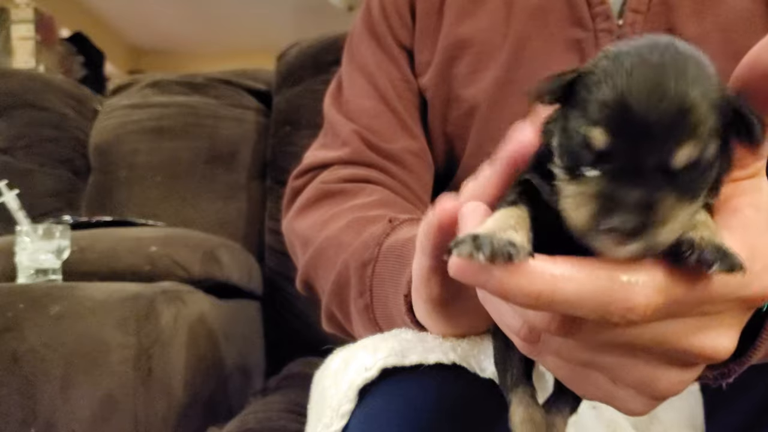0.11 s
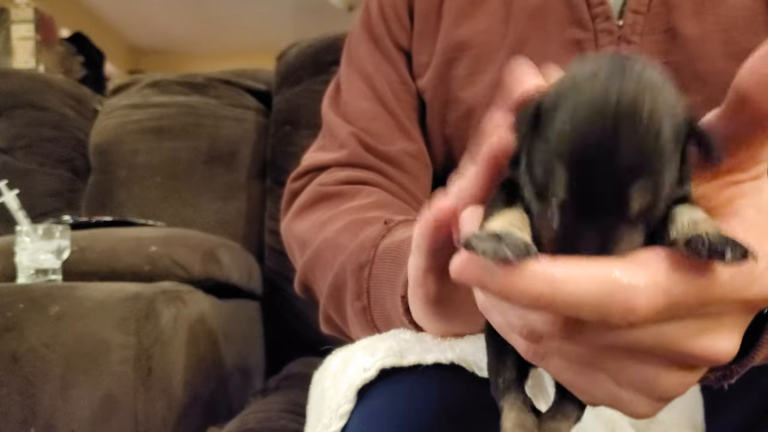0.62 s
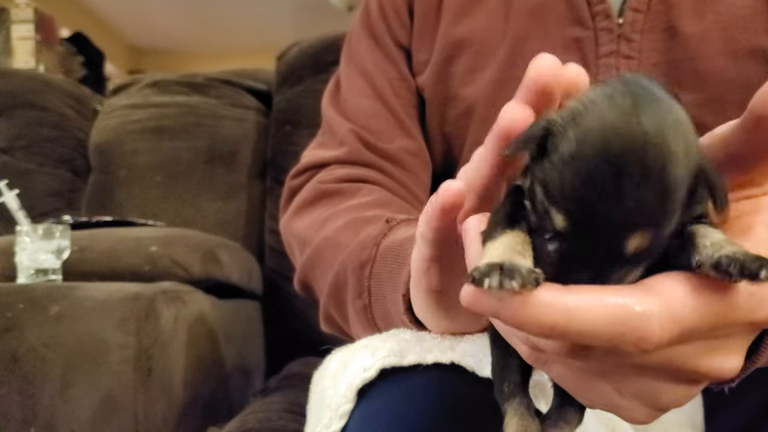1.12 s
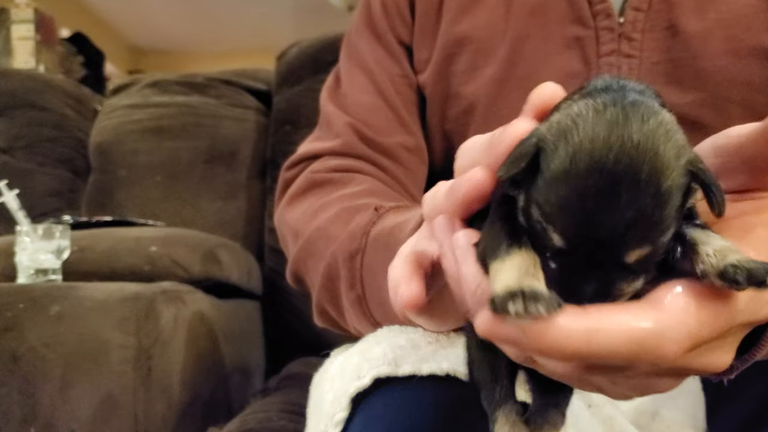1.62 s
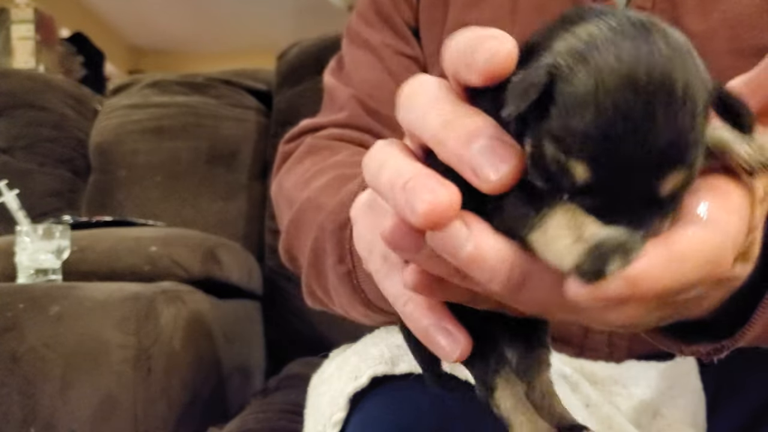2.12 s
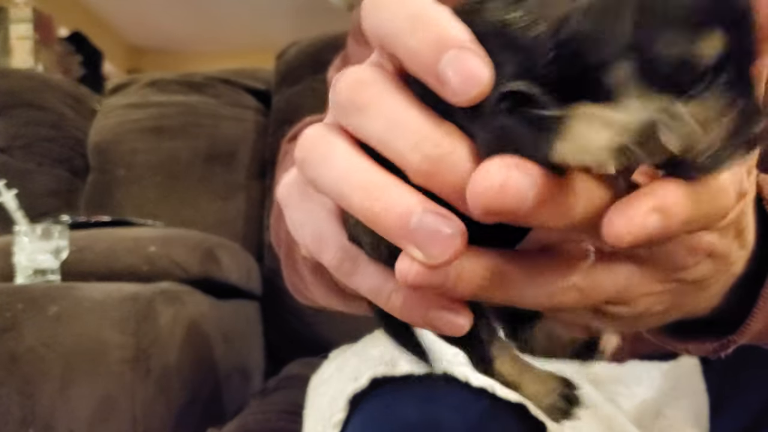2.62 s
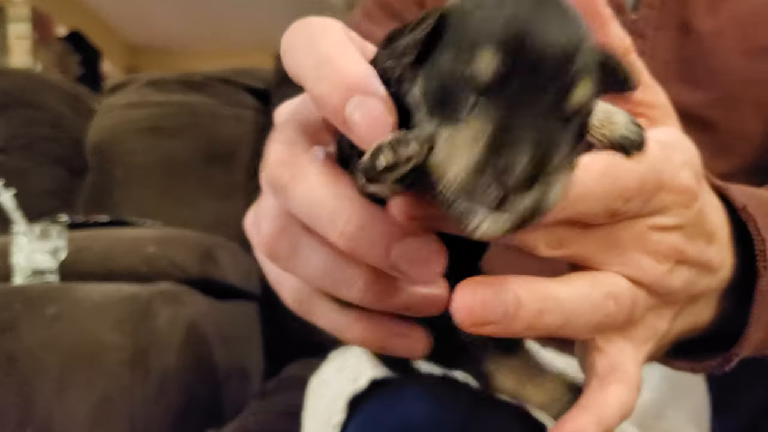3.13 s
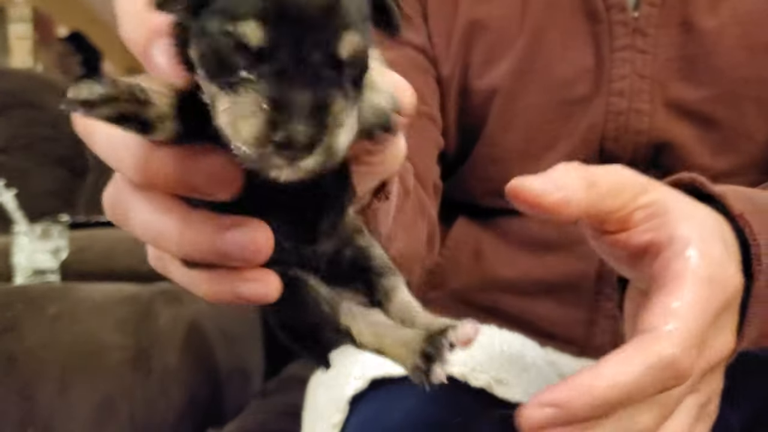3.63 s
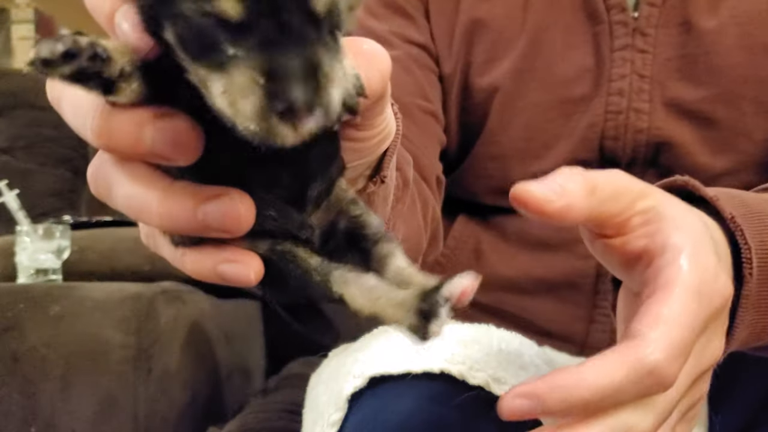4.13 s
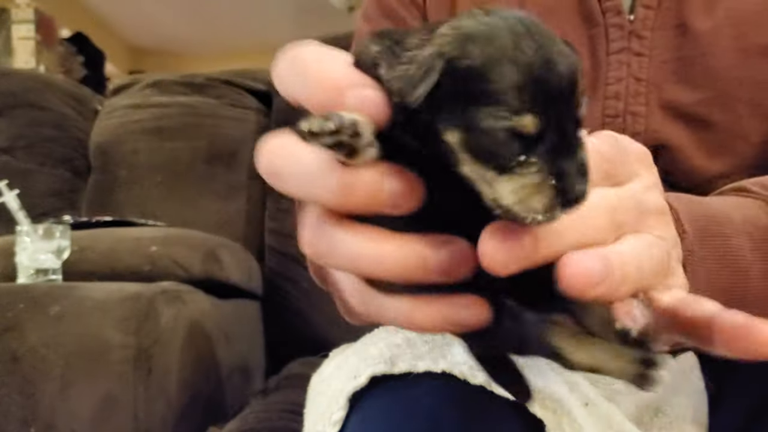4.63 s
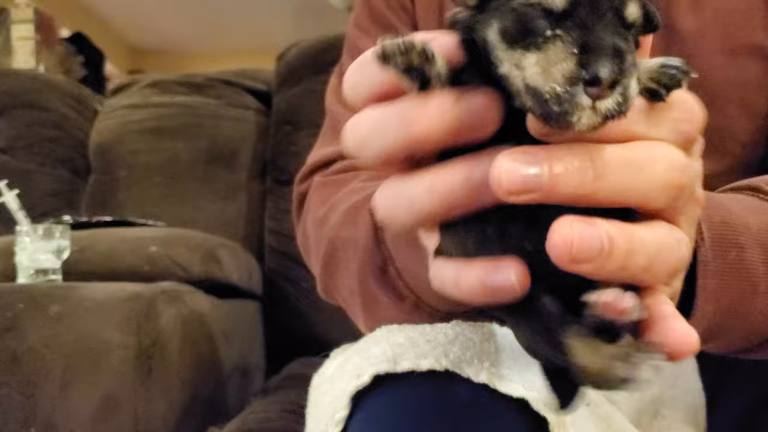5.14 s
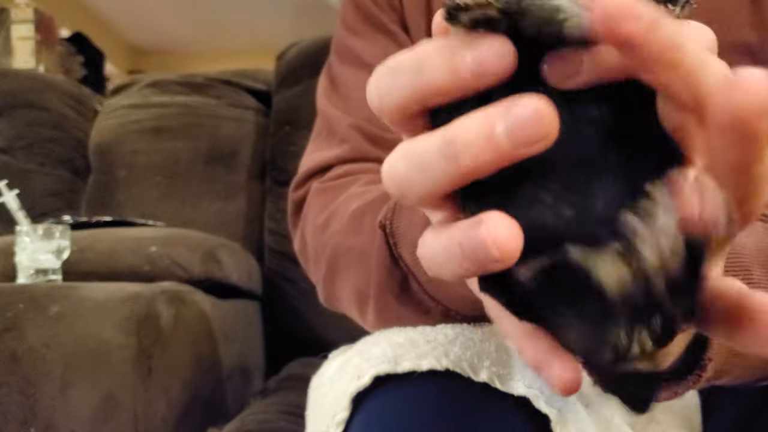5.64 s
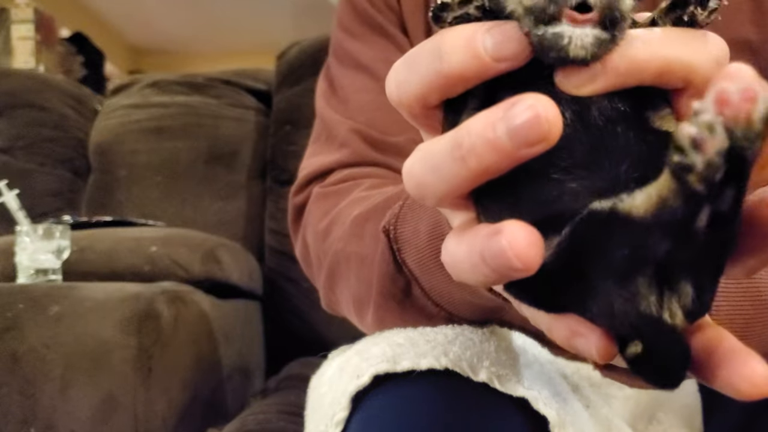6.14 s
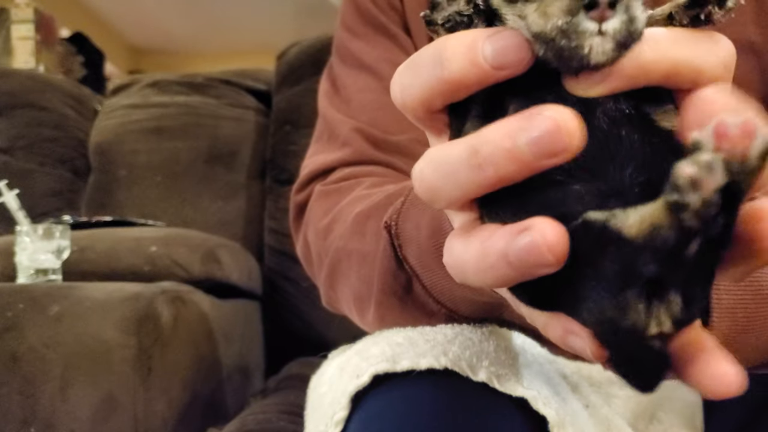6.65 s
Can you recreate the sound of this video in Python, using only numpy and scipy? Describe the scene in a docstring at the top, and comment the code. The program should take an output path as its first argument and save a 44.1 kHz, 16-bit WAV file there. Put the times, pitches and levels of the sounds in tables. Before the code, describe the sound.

Tiny puppy whimpers close up: small soft peeps and mouth clicks first, then regular short yelping cries, the last one longer and rasping.

```python
"""Newborn puppy crying

A puppy held close to a stereo microphone in a soft furnished room whimpers, then cries in a steady bout.
Each cry is a stack of gliding partials, most with a rasp of random slaps and a puff of filtered noise.
Its wet mouth clicks with short rings and fur rustles in dull grains; an appliance hums on two low tones
that swell and drop out, over shaped-noise rumble and faint microphone hiss."""
import sys
import numpy as np
from scipy import signal
from scipy.fft import rfft, irfft, next_fast_len
from scipy.io import wavfile
from scipy.ndimage import uniform_filter1d

SR = 44100
rng = np.random.default_rng(int(sys.argv[2]) if len(sys.argv) > 2 else 0)


def natural_amplitude(level_db):
    """Convert a level in decibels to a linear amplitude factor, elementwise."""
    exponent = np.asarray(level_db, float) / 20
    return 10 ** exponent


def output_pcm(signal):
    """Save a mono or channel-first signal as 16-bit PCM at the path in sys.argv[1].

    Samples are clipped to [-1, 1] before scaling.
    """
    pcm = np.clip(np.atleast_2d(signal).T, -1, 1) * 32767
    wavfile.write(sys.argv[1], SR, np.round(pcm).astype(np.int16))


N = 298998

# voiced cries, one curve each: (time [s], pitch [Hz], level [dB])
CRY_CURVES = [
    [(.253, 430, -68), (.259, 475.8, -58), (.268, 509.3, -47.5), (.275, 462.3, -40), (.283, 437.9, -62),
     (.293, 420.8, -58)],
    [(.496, 456, -67), (.508, 496, -42.5), (.518, 531, -61), (.526, 495, -53)],
    [(.74, 588, -61), (.746, 639.2, -56), (.754, 698, -43), (.764, 718, -38), (.786, 643, -38.5),
     (.794, 610, -36), (.802, 618, -54)],
    [(1.512, 801, -63), (1.518, 830, -52.5), (1.546, 1035, -42.5), (1.554, 1041, -32), (1.564, 889, -48),
     (1.572, 817, -41), (1.58, 820, -67)],
    [(1.702, 711, -85), (1.708, 713, -47), (1.716, 734, -57.5), (1.722, 756, -57)],
    [(1.826, 798, -64.5), (1.832, 796, -54), (1.84, 733, -40.5), (1.85, 728, -74)],
    [(2.011, 860, -54), (2.016, 758.2, -57), (2.026, 700, -52.5), (2.036, 759.5, -53.5),
     (2.045, 858.8, -64)],
    [(2.305, 799, -93), (2.313, 774, -49.5), (2.323, 676, -49), (2.343, 600, -55.5), (2.352, 608, -58),
     (2.362, 619, -70)],
    [(3.127, 290, -63.5), (3.136, 390, -35.5), (3.146, 464.5, -33), (3.156, 518, -29.5),
     (3.172, 586.6, -29), (3.19, 685, -30), (3.2, 690, -25.5), (3.216, 636, -29), (3.236, 563, -43.5)],
    [(3.398, 981, -69), (3.404, 980, -46.5), (3.414, 980, -46.5), (3.432, 997, -37.5), (3.47, 842, -29),
     (3.484, 702, -28.5), (3.498, 644, -44)],
    [(3.672, 978, -71.5), (3.677, 968, -51.5), (3.686, 911, -47.5), (3.722, 885, -36), (3.744, 745, -35),
     (3.758, 730, -34), (3.762, 730, -82)],
    [(3.94, 1139, -62), (3.95, 1039, -54), (3.96, 972, -39.5), (4.008, 1097, -36), (4.026, 1061, -28.5),
     (4.036, 933, -41), (4.044, 839, -26), (4.052, 865, -75.5)],
    [(4.258, 935, -64.5), (4.263, 895, -56), (4.272, 856, -50.5), (4.292, 896, -41), (4.322, 785, -31.5),
     (4.334, 728, -30.5), (4.346, 715, -61)],
    [(4.525, 894, -59), (4.539, 785, -49.5), (4.565, 849, -36.5), (4.605, 835, -29.5), (4.619, 723, -30),
     (4.639, 636, -45)],
    [(4.82, 681, -51.5), (4.842, 786, -39.5), (4.866, 825, -31.5), (4.9, 873, -24.5), (4.922, 867, -28),
     (4.936, 748, -26), (4.948, 718, -45)],
    [(5.128, 650, -54), (5.142, 732, -55.5), (5.174, 883, -33.5), (5.216, 876, -31.5), (5.232, 781, -30),
     (5.244, 733, -30), (5.256, 731, -60)],
    [(5.452, 855, -65), (5.462, 898, -49.5), (5.486, 933, -37), (5.516, 879, -29), (5.558, 822, -31),
     (5.574, 754, -32.5), (5.592, 776, -42.5)],
    [(5.771, 1480, -52.5), (5.777, 1400, -56.5), (5.793, 1005, -40), (5.815, 1005, -33.5),
     (5.857, 932, -37), (5.883, 861, -32), (5.893, 764, -38.5), (5.907, 672, -38.5), (5.911, 670, -42)],
    [(6.112, 880, -61), (6.13, 963, -46.5), (6.16, 954, -37), (6.186, 882, -38), (6.202, 869, -50.5),
     (6.224, 906, -44.5), (6.234, 907, -51)],
    [(6.488, 1316, -49), (6.498, 1253, -47), (6.508, 1032, -38), (6.542, 935, -29.5), (6.564, 888, -30.5),
     (6.582, 829, -36.5), (6.615, 827.4, -31.5), (6.65, 822, -30.5), (6.656, 825, -40)],
    [(6.68, 1350, -43), (6.69, 1500, -37), (6.705, 1400, -42), (6.72, 950, -43), (6.732, 780, -72)],
]
# puffs of air, with or without a cry; a long cry may have several:
# (start [s], break [s], tail [s], leak under the voice [dB], throat rasp [dB],
# mouth rush [dB], nostril hiss [dB], pinch: top nostril resonance against the lower ones [dB])
BREATH_ROWS = [ (0.29, 0.254, 0.062, -83, -39.5, -69, -57, 14),
               (0.493, 0.5, 0.078, -85, -54.5, -71, -62, 8), (0.726, 0.773, 0.054, -78, -52.5, -55, -50, 8),
               (1.28, 1.289, 0.054, -74, -58, -64.5, -49.5, 9),
               (1.502, 1.565, 0.07, -61.5, -52, -57.5, -46.5, 7.5),
               (1.826, 1.832, 0.056, -62, -49, -56.5, -46, 6), (1.89, 1.943, 0.096, -72, -75, -78, -68, 10),
               (2.104, 2.107, 0.042, -72, -72, -77, -59.5, -8),
               (2.663, 2.682, 0.051, -51.5, -46.5, -57.5, -41.5, 0),
               (2.863, 2.915, 0.087, -71, -71, -69.5, -63.5, -4),
               (3.111, 3.138, 0.055, -58, -45.5, -43.5, -49, 9),
               (3.16, 3.215, 0.044, -55.5, -42, -34.5, -31.5, 18),
               (3.397, 3.471, 0.07, -66, -42, -52, -41.5, 5),
               (3.681, 3.743, 0.048, -59, -35, -53.5, -40.5, 17),
               (3.94, 4.04, 0.068, -57.5, -42.5, -50, -45, 21),
               (4.257, 4.331, 0.051, -58, -44, -50, -43, 9.5),
               (4.521, 4.617, 0.069, -64.5, -40, -46, -45, 3.5),
               (4.815, 4.938, 0.073, -51.5, -41.5, -55.5, -45.5, 3.5),
               (5.115, 5.235, .06, -61, -40, -53, -43, 4),
               (5.445, 5.56, 0.071, -54.5, -36, -55.5, -39, 7.5),
               (5.776, 5.892, 0.063, -52, -35, -44.5, -37.5, 3.5),
               (6.107, 6.212, .06, -54.5, -49, -43.5, -54, 2.5),
               (6.199, 6.244, 0.052, -57, -37, -44, -39.5, 8),
               (6.485, 6.599, 0.076, -43, -45, -45.5, -36.5, 7),
               (6.601, 6.665, 0.066, -41, -27.5, -42, -39, 5),
               (6.681, 6.699, 0.12, -29.5, -52, -63, -60, 2.5), ]
# mouth of each cry: (resonance [Hz], roughness [1], octave against fundamental [dB],
# upper partials against fundamental [dB], upper partials' gain per dB of effort [dB/dB])
MOUTH_ROWS = [(1340, .3, -1, -1.5, -0.4), (1500, .3, 2, -6, .3), (3470, 0.25, 1, -2.5, .3),
              (3190, 0.14, -4.5, -10.5, .1), (1900, 0.31, -7, -32, .2), (3600, .5, -5, -12, .2),
              (1900, .4, -22, -43, .2), (2040, 0.33, -22.5, -36, .2), (3434, .4, -3.5, 5.5, -0.58),
              (2500, .1, -1.5, -6.5, 1), (2750, 0.21, -5.5, -14, 0.61), (2800, 0.056, -1.5, -15.5, -0.22),
              (2950, 0.19, -4.5, -18, .3), (2780, 0.071, -0.5, -9, 0.28), (3220, 0.13, 4.5, -10, -0.13),
              (3283, 0.06, -3, -16.5, -0.52), (3080, 0.27, -3, -5, -0.39), (3120, .15, 0, 2.5, 0.84),
              (3380, .15, 0.5, 6.5, 0.94), (3600, 0.43, 0.5, 9.5, .6), (3530, 0.837, -2, -29, .2)]


def rms_one(x):
    """Scale to unit power."""
    return x / np.sqrt(np.mean(x ** 2) + 1e-20)


def in_time(rows):
    """Columns of a curve, one value per sample."""
    s, *columns = np.transpose(rows)
    return [np.interp(np.arange(N) / SR, s, c) for c in columns]


def in_bouts(tables, edge_s):
    """Columns of a list of curves, with a gate that is shut between them."""
    gate = np.zeros(N)
    for rows in tables:
        gate[int(rows[0][0] * SR):int(rows[-1][0] * SR)] = 1
    all_rows = sum(map(list, tables), [])
    return uniform_filter1d(gate, int(edge_s * SR)), in_time(all_rows)


def per_bout(starts_s, values):
    """One value a bout, held until 10 ms before the next bout."""
    bout = np.searchsorted(np.array(starts_s) - .01, np.arange(N) / SR) - 1
    return np.array(values)[np.maximum(bout, 0)]


def at_hz(points, hz):
    """Read a spectrum on a log-frequency axis."""
    points = np.array(points)
    return np.interp(np.log(hz), np.log(points[:, 0]), points[:, 1])


def drift(corner_hz):
    """Slow chance of spread 1: noise through two equal poles."""
    r = np.exp(-2 * np.pi * corner_hz / SR)
    noise = rng.standard_normal(N + SR)
    return rms_one(signal.lfilter([1], [1, -2 * r, r * r], noise)[SR:])


def resonate(x, modes):
    """Parallel resonances with alternating signs, each passed twice for dark valleys."""
    out = 0
    for k, (hz, width_hz, level_db) in enumerate(modes):
        r = np.exp(-np.pi * width_hz / SR)
        b = (1 - r * r) / 2 * np.array([1, 0, -1])
        a = [1, -2 * r * np.cos(2 * np.pi * hz / SR), r * r]
        twice = signal.lfilter(b, a, signal.lfilter(b, a, x))
        out = out + (-1) ** k * natural_amplitude(level_db) * twice
    return out


def floor():
    """Steady shaped noise: rumble mostly alike on both sides, microphone hiss almost unrelated."""
    # (frequency [Hz], relative density [dB])
    spectrum = [(22, -28), (40, -8), (60, -11.5), (100, -10.5), (135, -20.5), (190, -28.5), (260, -22.5),
                (420, -32), (900, -40.5), (2200, -40), (4800, -43.5), (6300, -32), (7500, -46.5),
                (9700, -30), (14500, -40)]
    # (frequency [Hz], left-right correlation [1])
    likeness = [(60, 0.53), (130, 0.95), (640, 0.39), (1400, 0.0077)]
    level_db = -66
    hz = np.maximum(np.arange(N // 2 + 1) * SR / N, 1)
    alike = np.clip(at_hz(likeness, hz), 0, 1)
    mid, side = rfft(rng.standard_normal((2, N))) * natural_amplitude(at_hz(spectrum, hz))
    mid = np.sqrt(1 + alike) * mid
    side = np.sqrt(1 - alike) * side
    return natural_amplitude(level_db) * rms_one(irfft([mid + side, mid - side], N))


def hum():
    """Two low motor tones, pitch wavering slightly, level swelling and dropping out."""
    # (time [s], lower tone level [dB], upper tone level [dB])
    levels = [(0.0, -66, -70), (3.1, -71.5, -67), (3.19, -56.5, -60), (3.42, -67.5, -70),
              (4.08, -68.5, -59), (4.13, -91, -93), (4.22, -92, -83), (4.28, -64, -64.5), (6.72, -69, -67),
              (6.78, -74, -65)]
    # (lower tone [Hz], upper tone [Hz])
    tones_hz = (59, 91)
    out = 0
    for hz, level_db in zip(tones_hz, in_time(levels)):
        level = np.sqrt(2) * natural_amplitude(level_db + 3.4 * drift(12))
        out = out + level * np.sin(2 * np.pi * np.cumsum(hz + 0.63 * drift(2.8)) / SR)
    return out * natural_amplitude(np.array([[-1.2], [1.2]]))     # right side louder


def room(x):
    """Eight feedback delays a side, duller on every round."""
    t60_s, wall_cut_hz = 0.3, 3000
    size = next_fast_len(N + SR)
    hz = np.arange(size // 2 + 1) * SR / size
    source, out = rfft(x, size), np.zeros((2, size // 2 + 1), complex)
    for k, lag_s in enumerate(rng.uniform(0.012, 0.032, 16)):
        loop = natural_amplitude(-60 * lag_s / t60_s) / (1 + 1j * hz / wall_cut_hz) * np.exp(-2j * np.pi * hz * lag_s)
        out[k % 2] += (-1) ** (k // 2) * loop / (1 - loop)
    return irfft(out * source, size)[:, :N]


def rustle(grains_per_s):
    """Hands shift on fur: dull grains in lumps."""
    # one curve a shift: (time [s], level [dB])
    shifts = [
        [(.075, -66), (.098, -49), (.12, -62)],
        [(1.87, -69), (1.93, -66.5), (2.0, -70)],
        [(2.09, -60), (2.13, -62), (2.2, -61.5), (2.26, -75)],
        [(6.35, -86), (6.39, -66), (6.42, -67)],
        [(6.66, -58), (6.7, -43.5), (6.76, -82)],
    ]
    # (resonance [Hz], width per pass [Hz], relative level [dB])
    fur_modes = [(308, 370, 61), (734, 380, -41)]
    gate, (level_db,) = in_bouts(shifts, edge_s=0.05)
    strength_db = 0.9 * rng.standard_normal(N) + 3.05 * drift(14.2)
    grains = (rng.random(N) < grains_per_s / SR) * natural_amplitude(strength_db)
    dull = signal.lfilter(*signal.butter(2, 1300, fs=SR), grains + 1e-18)
    return gate * natural_amplitude(level_db) * rms_one(resonate(dull, fur_modes))


def clicks(ring_s, burst_s, crack_db):
    """A film of saliva snaps: a short ring at the pitch of the cavity; small high cavities also crack."""
    # wet clicks and pops: (time [s], ring peak [dB], ring pitch [Hz])
    snaps = [(0.837, -36, 5660), (1.2904, -72, 13660), (1.6557, -45.5, 950), (1.7093, -43, 850),
             (1.667, -59, 1000), (1.7072, -49.5, 9300), (1.8464, -34, 1220), (1.8551, -38.5, 915),
             (2.0998, -50, 900), (2.1773, -58, 590), (2.203, -58, 700), (2.205, -48.5, 9200),
             (2.4796, -63.5, 11550), (2.6747, -57, 13500), (2.6827, -35.5, 770), (2.7485, -50, 1660),
             (2.75, -44, 8900), (3.0629, -43, 3900), (3.514, -50, 13100), (3.5338, -51.5, 13500),
             (3.639, -65, 13500), (4.0677, -30, 4830), (4.499, -54.5, 11220), (5.3752, -44, 6130),
             (5.3851, -56, 4620), (5.728, -40, 5980), (5.7325, -46, 5600), (5.744, -49, 4470),
             (6.2506, -16.5, 2875), (6.381, -48, 1070), (6.4046, -43.5, 1030), (6.437, -48.5, 3040),
             (6.462, -46, 3680), (6.477, -40, 6320), (6.6553, -23, 1284)]
    out, t = np.zeros(N), np.arange(int(0.0062 * SR)) / SR
    cracks = rng.standard_normal((len(snaps), len(t)))
    for (s, peak_db, hz), crack in zip(snaps, cracks):
        decay = np.exp(-t * np.sqrt(hz / 3000) / ring_s)      # big cavities ring longer
        ring = np.sin(2 * np.pi * hz * t) * t * decay
        burst = natural_amplitude(crack_db) * (hz / 6000) ** 2 * crack * np.exp(-t / burst_s)
        at = int(s * SR)
        out[at:at + len(t)] += natural_amplitude(peak_db) * (ring / np.max(np.abs(ring)) + burst)
    return out


def pinch():
    """How pinched the nostrils are, held from each puff of air to the next, in dB."""
    return per_bout([row[0] for row in BREATH_ROWS], [row[-1] for row in BREATH_ROWS])


def airflow():
    """Each row: first puff, leak under the voice, burst at the break, short tail; gate and three levels."""
    # rows rasp, rush, hiss: (first puff, lull [dB re leak; rasp: re its own level],
    # at the break, after the hold, at the end [dB re own level])
    shapes = [(-24.5, -36, 1.5, -15, -37), (-3.5, -6, -4, -1.3, -20.5), (2, 4.5, -2.5, -2.5, -28.5)]
    puff_s, swell_s, hold_share, still_db = 0.013, 0.036, 0.4, -88.5      # hold: share of the tail
    gate, levels = np.zeros(N), np.full((3, N), -120.)
    for start, burst, tail_s, leak_db, rasp_db, rush_db, hiss_db, _ in BREATH_ROWS:
        s = np.array([start, start + puff_s, burst - swell_s,
                      burst, burst + hold_share * tail_s, burst + tail_s])
        # keep puff and lull before the break
        s[1:3] = np.minimum(np.maximum.accumulate(s[1:3]), burst - .002)
        at = np.arange(int(start * SR), min(int(s[-1] * SR), N))
        gate[at] = 1
        early = (rasp_db, leak_db, leak_db)
        late = (rasp_db, rush_db, hiss_db)
        for level, early_db, late_db, shape in zip(levels, early, late, shapes):
            db = np.r_[still_db, early_db + np.array(shape[:2]), late_db + np.array(shape[2:])]
            level[at] = np.maximum(level[at], np.interp(at / SR, s, db))
    return gate, levels


def breath(gate, rasp_db, rush_db, hiss_db, pulsing, clear, slaps_per_s):
    """Loose folds slap at random into the throat; air rushes through mouth and nostrils, pulsed by the voice."""
    # all three: (resonance [Hz], width per pass [Hz], relative level [dB])
    rasp_modes = [(700, 570, 1.5), (1500, 640, 2)]
    rush_modes = [(2870, 1800, -13), (4350, 1100, -13.5), (6440, 1600, -11)]
    nostril_modes = [(6480, 530, -25.5), (9780, 1870, 17), (13010, 2000, 4)]
    strength_db = 1.9 * np.clip(rng.standard_normal(N), -2, 2)
    slaps = (rng.random(N) < slaps_per_s / SR) * natural_amplitude(strength_db)
    rasp = resonate(slaps + 0.029 * rng.standard_normal(N), rasp_modes)
    # the small throat passes little bass
    rasp = rms_one(signal.lfilter(*signal.butter(2, 400, "high", fs=SR), rasp))
    flutter = 1.5 + rms_one(signal.lfilter([1], [1, -.96], slaps))       # each slap lets out a puff
    rush = rms_one(resonate(flutter * rng.standard_normal(N), rush_modes))
    air = natural_amplitude(2.6 * drift(150)) * rng.standard_normal(N)
    bright = natural_amplitude(pinch() / 2)
    lower = rms_one(resonate(air, nostril_modes[:-1]))
    top = rms_one(resonate(air, nostril_modes[-1:]))
    hiss = (lower / bright + top * bright) / np.sqrt(bright ** 2 + bright ** -2)
    # a clear voice leaves the mouth almost free of rush
    flow = natural_amplitude(rush_db - 14.0 * clear) * rush + natural_amplitude(hiss_db) * hiss
    return gate * (natural_amplitude(rasp_db) * rasp + pulsing * flow)


def partial_levels(pitch, level_db):
    """Share a cry's level among fundamental, octave and upper partials, in dB."""
    # throat's lift of the octave partial near its resonance: (frequency of the octave [Hz], gain [dB])
    octave_gain = [(600, -1.5), (900, 1.5), (1300, 8), (1600, 4), (1760, 3), (1900, -9), (2150, -11.5),
                   (2900, -20)]
    close_s, close_octave_db, close_upper_db = 0.019, -19.5, -13.5      # closing mouth dulls the end
    open_s, open_upper_db = 0.0043, -11      # opening mouth lets the upper partials out
    starts_s = [rows[0][0] for rows in CRY_CURVES]
    spans = [(rows[0][0], rows[-1][0], np.max(np.array(rows)[:, 2])) for rows in CRY_CURVES]
    start, end, top_db = per_bout(starts_s, spans).T
    octave_db, upper_db, follows = per_bout(starts_s, MOUTH_ROWS).T[2:]
    t = np.arange(N) / SR
    shut = np.clip(1 - (end - t) / close_s, 0, 1)
    opening = np.clip(1 - (t - start) / open_s, 0, 1)
    effort_db = follows * (level_db - top_db)
    shares_db = np.array([
        0 * pitch,
        octave_db + at_hz(octave_gain, 2 * pitch) + close_octave_db * shut,
        upper_db + effort_db + close_upper_db * shut + open_upper_db * opening])
    return level_db + shares_db - 10 * np.log10(np.sum(natural_amplitude(shares_db) ** 2, axis=0))


def voice(rasp_db, hiss_db, jitter, shimmer_db):
    """The vocal folds give a stack of partials; the rougher the cry, the less steady its pitch and level."""
    # mouth resonance shaping the upper partials: (multiple of its centre [1], gain [dB])
    throat_gain = [(.35, -4), (.7, -9.5), (1.0, 1), (1.3, -8), (1.55, -22.5), (1.75, -23.5), (2.5, -30),
                   (6.0, -58)]
    treble_db, tear_db = -3.5, 10.0      # treble at 12.5 kHz re nostril hiss; tear per unit roughness
    gate, (pitch, level_db) = in_bouts(CRY_CURVES, edge_s=0.00083)
    first_db, octave_db, upper_db = partial_levels(pitch, level_db)
    mouth_hz, rough = per_bout([rows[0][0] for rows in CRY_CURVES], MOUTH_ROWS).T[:2]
    # treble is tonal while the folds close well: voice well clear of the rasp
    clear = gate * np.clip((np.maximum(first_db, octave_db) - rasp_db - 15) / 12, 0, 1)
    rough = rough * (2.5 - 1.5 * clear)      # the voice tears where the rasp takes over
    phase = 2 * np.pi * np.cumsum(pitch * (1 + jitter * rough * drift(80))) / SR
    on = gate > 0
    hz = np.arange(3, 30)[:, None] * pitch[on]
    throat = natural_amplitude(at_hz(throat_gain, hz / mouth_hz[on]))
    throat *= natural_amplitude(upper_db[on]) / np.sqrt(np.sum(throat ** 2, axis=0))
    slope_db = 11.0 + pinch()[on]      # per octave
    treble = clear[on] * natural_amplitude(hiss_db[on] + treble_db + slope_db * np.log2(hz / 12500))
    high = np.clip((hz - 8300) / 800, 0, 1)     # up here the nostrils take over
    levels = ((1 - high) * throat + high * treble) * (hz < .4 * SR)
    # every upper partial wavers at its own shift of the drift, the highest most
    flicker, tear = drift(42), drift(190)
    torn_db = tear_db * np.minimum(rough[on], .55)
    for k in range(len(levels)):
        levels[k] *= natural_amplitude((0.8 + 1.3 * high[k]) * np.roll(flicker, 9001 * k)[on])
        levels[k] *= natural_amplitude(torn_db * (np.roll(tear, 7001 * k)[on] - 1.0))
    wave = natural_amplitude(first_db[on]) * np.cos(phase[on]) + natural_amplitude(octave_db[on]) * np.cos(2 * phase[on])
    wave += sum(level * np.cos(k * phase[on] + k * k * 0.11) for k, level in enumerate(levels, 3))
    out = np.zeros(N)
    out[on] = -np.sqrt(2) * wave        # pressure pulses point down
    return out * gate * natural_amplitude(shimmer_db * rough * drift(80)), phase, clear


def placed(x, shadow_hz, echo_db):
    """The muzzle's side sets the lag, and the level above the bass; the restless hands throw short echoes."""
    # (time [s], left over right [dB], lag of the left side [ms])
    muzzle = [(.3, 2.5, 0.042), (1.5, 6.5, 0.026), (2.7, 0, 0.051), (3.2, 6, -0.03), (3.7, 5.5, -0.088),
              (4.3, 6, -0.078), (5.5, 2, 0.016), (6.6, 1.5, 0.027)]
    # mean echo delay: (left [s], right [s])
    echo_delays_s = (0.000797, 0.001154)
    pan_db, lag_ms = in_time(muzzle)
    fine = signal.resample_poly(x, 4, 1)      # for clean fractional delays
    at, out = np.arange(N), []
    for side, echo_s in zip((1, -1), echo_delays_s):
        heard = np.interp(4 * (at - side * lag_ms * SR / 2000), np.arange(4 * N), fine)
        bass = signal.lfilter(*signal.butter(1, shadow_hz, fs=SR), heard)
        upper = heard - bass
        echo = np.interp(at - echo_s * SR * (1 + 0.19 * drift(2.26)), at, upper)
        out.append(bass + natural_amplitude(side * pan_db / 2) * (upper + natural_amplitude(echo_db) * echo))
    return np.array(out)


def scene():
    """Puppy near the microphone, its room sound, hum and floor."""
    gate, (rasp_db, rush_db, hiss_db) = airflow()
    cries, phase, clear = voice(rasp_db, hiss_db, jitter=.011, shimmer_db=1.0)
    # a clear voice leaks less air, one puff per fold cycle
    pulsing = natural_amplitude(-5.0 * clear) * (1 + 0.2 * clear * np.cos(phase))
    puppy = cries + breath(gate, rasp_db, rush_db, hiss_db, pulsing, clear, slaps_per_s=500.0)
    puppy += clicks(ring_s=0.00023, burst_s=0.00051, crack_db=-6.5)
    puppy += rustle(grains_per_s=170.0)
    room_db = -24
    return placed(puppy, shadow_hz=900, echo_db=-10.5) + natural_amplitude(room_db) * room(puppy) + hum() + floor()


def roll_off(x):
    """The treble ends steeply here."""
    return signal.sosfilt(signal.butter(12, 15590, fs=SR, output="sos"), x)


def record(dry):
    """A steep elliptic low-pass cuts the top of the mix."""
    cutoff_hz = 14680
    low_pass = signal.ellip(8, 1, 40, cutoff_hz, fs=SR, output="sos")
    return roll_off(signal.sosfilt(low_pass, dry))


dry = scene()
out = record(dry)
output_pcm(out)
```